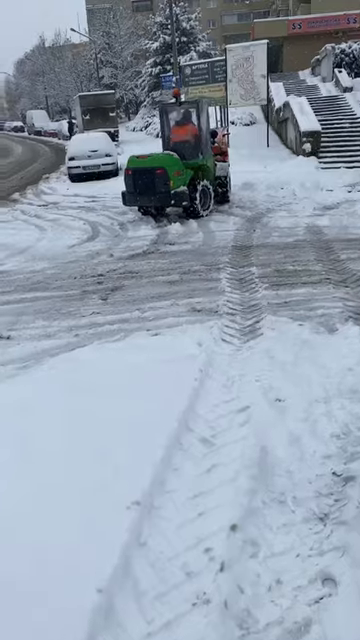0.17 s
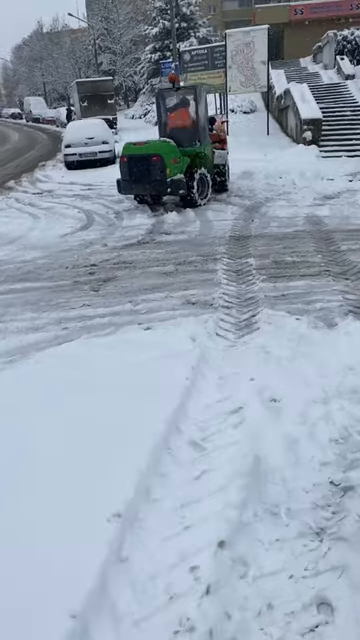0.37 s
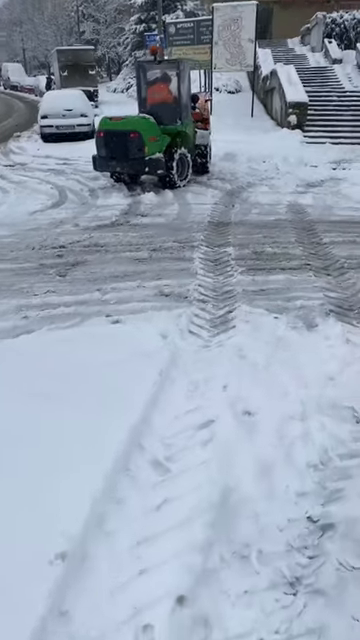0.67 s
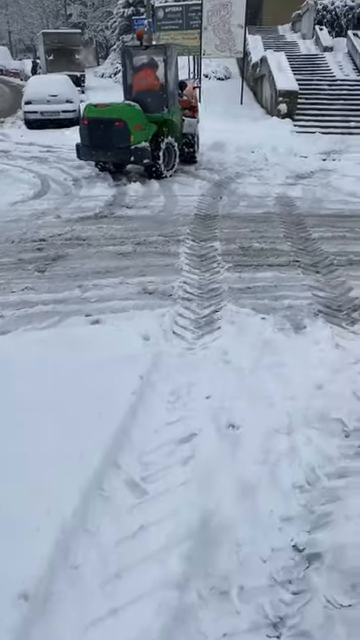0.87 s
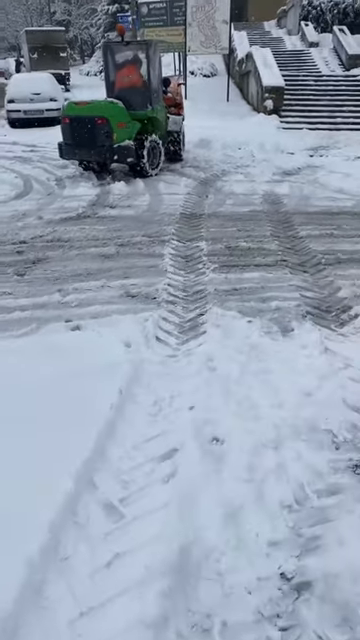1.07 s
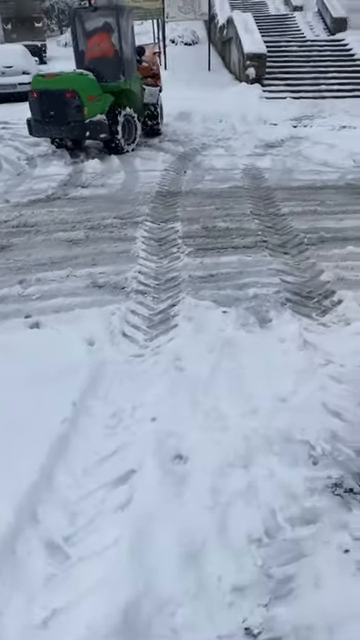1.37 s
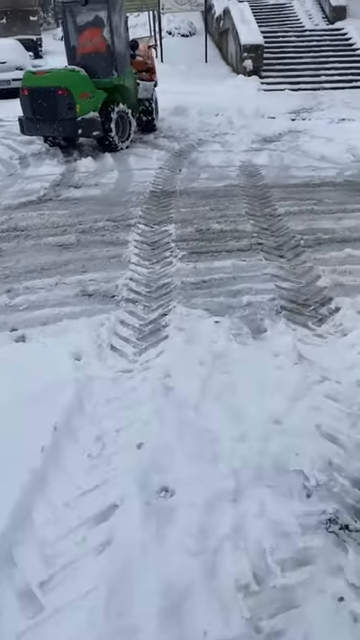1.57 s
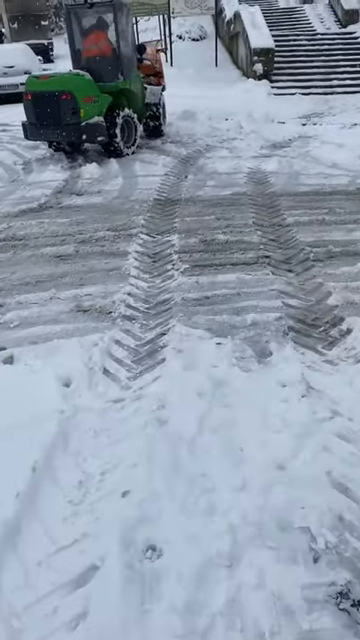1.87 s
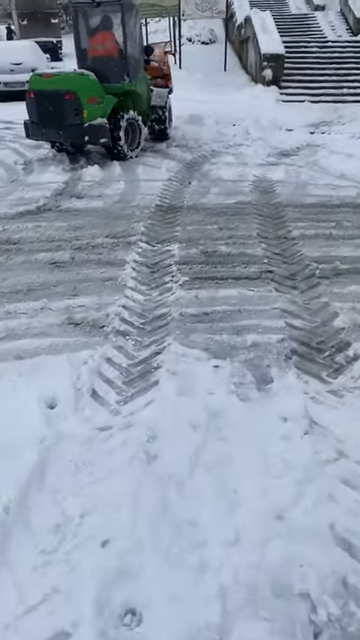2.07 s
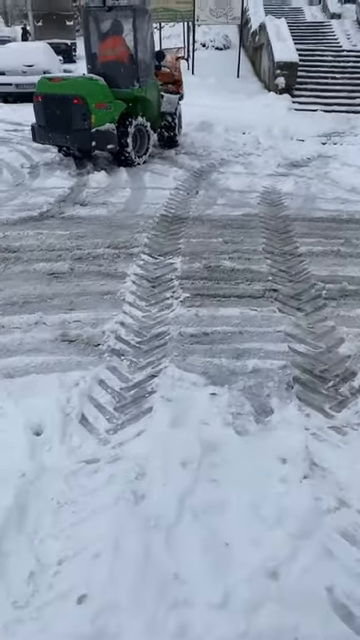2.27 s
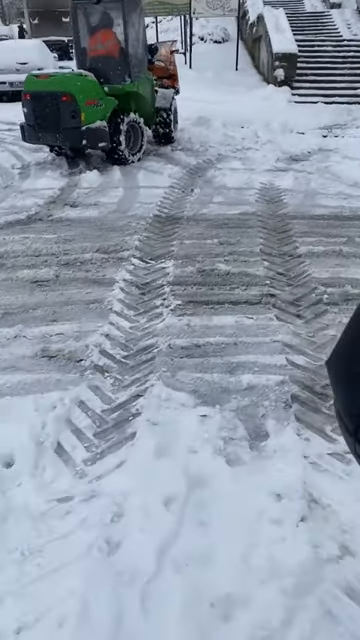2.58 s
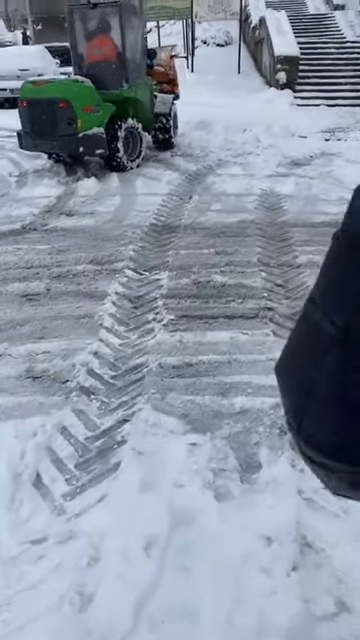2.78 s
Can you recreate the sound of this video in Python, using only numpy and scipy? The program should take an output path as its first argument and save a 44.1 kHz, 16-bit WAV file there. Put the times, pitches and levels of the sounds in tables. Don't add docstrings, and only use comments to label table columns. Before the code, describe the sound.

A small diesel tractor drones throughout at almost constant speed, some metres away on a snowy street: low buzzing hum, broad fan roar, dense metallic clatter and thin pump whine. Low wind buffeting rumbles on the hand-held phone until about 1.2 s, then fades. A short dull tap hits the case at 2.05 s, while hollow exhaust noise opens up; engine pitch sags very slightly near 2.4 s, then recovers.

```python
import sys
import numpy as np
from scipy import signal
from scipy.fft import rfft, irfft
from scipy.io import wavfile
from scipy.ndimage import uniform_filter1d, map_coordinates

SR = 44100
rng = np.random.default_rng(int(sys.argv[2]) if len(sys.argv) > 2 else 0)


def waveform_to_disk(signal):
    frames = np.transpose(np.atleast_2d(signal))
    scaled = np.clip(frames, -1, 1) * 32767
    samples = np.round(scaled).astype(np.int16)
    wavfile.write(sys.argv[1], SR, samples)


def ratio(d):
    e = np.asarray(d, float) / 20
    return 10 ** e


N = 128772

PUMP_RATIO = 3.448
# time_s, level_db, treble_db
POSE = [(.1, -1.5, -3.5), (.3, -1, 0.5), (.6, -1.5, 4.5), (.8, 0, -4), (1.05, 0.5, -4), (1.35, 1.5, -9.5),
        (1.6, 0, 2.5), (2.05, -0.5, 2), (2.35, 2, -2), (2.55, 0.5, -2), (2.7, 1, -3.5), (2.92, -0.5, 1)]
# time_s, level_db
TURN = [
    (.1, -25),
    (.7, -6),
    (1.2, -10),
    (1.7, -10),
    (2.0, 8),
    (2.4, 2.5),
    (2.7, 1),
    (2.92, 7),
]


def evened(x):
    return x / np.sqrt(np.mean(x ** 2) + 1e-20)


def curve(table, column, t=None):
    rows = np.array(table)
    if t is None:
        t = np.arange(N) / SR
    return np.interp(t, rows[:, 0], rows[:, column])


def drift(hz):
    f = np.fft.rfftfreq(N, 1 / SR)
    spectrum = rfft(rng.standard_normal(N)) / (1 + (f / hz) ** 4)
    return evened(irfft(spectrum, N))


def ring(x, hz, width_hz):
    r = np.exp(-np.pi * width_hz / SR)
    return signal.lfilter([1, 0, -1], [1, -2 * r * np.cos(2 * np.pi * hz / SR), r * r], x) * (1 - r)


def ticks(per_s, spread_db):
    strike = rng.random(N) < per_s / SR
    size = ratio(spread_db * np.minimum(rng.exponential(1, N), 4))
    return rng.choice([-1., 1.], N) * size * strike


def wind():
    # time_s, eddies_db, snaps_db
    gust = [(.1, -10.5, -58), (.18, -11, -20), (.29, -13.5, -18), (.39, -12.5, -15.5), (.53, -12, -36.5),
            (.63, -9, -26), (.72, -12.5, -31), (.82, -11, -23), (.9, -8.5, -21.5), (1.0, -16, -28),
            (1.06, -10, -21), (1.12, -13, -49), (1.3, -24, -65), (1.45, -36, -57), (1.7, -30, -35),
            (1.8, -21, -35), (2.0, -40, -35), (2.92, -37, -36)]
    # time_s, pitch_hz
    eddy_pitch = [(.1, 79.8), (.2, 100.6), (.35, 91), (.5, 64.47), (.64, 99.53), (.75, 90.6), (.9, 124.3),
                  (1.05, 80.24), (1.3, 60.14), (1.8, 70), (2.92, 80)]
    eddy_width_hz, evenness, lump_db = 71, 0.79, 1.0
    snap_hz, snap_width_hz = 230, 119

    slow = signal.lfilter(*signal.butter(2, eddy_width_hz / 2, fs=SR), rng.standard_normal((2, N)))
    swirl = (slow[0] + 1j * slow[1]) * np.exp(2j * np.pi * np.cumsum(curve(eddy_pitch, 1)) / SR)
    size = abs(swirl)
    eddies = evened((swirl / (size + 0.11 * size.mean()) ** evenness).real)
    eddies = signal.lfilter(*signal.butter(2, 52, "high", fs=SR), eddies)
    snaps = ring(ticks(per_s=200, spread_db=2.33), snap_hz, snap_width_hz)
    snaps = evened(ring(snaps, snap_hz, 2 * snap_width_hz))
    return ratio(curve(gust, 1) + lump_db * drift(8.4)) * eddies + ratio(curve(gust, 2)) * snaps


def knock():
    # start_s, peak_db, pitch_hz, decay_s
    tap = (2.0464, -8.5, 470, .00065)
    start_s, peak_db, hz, decay_s = tap
    t = np.maximum(np.arange(N) / SR - start_s, 0)
    swell = np.e * t / decay_s * np.exp(-t / decay_s)
    return -ratio(peak_db) * swell * np.sin(2 * np.pi * hz * t)


def roar():
    # pitch_hz, level_db
    colour = [(40, -1.5), (150, 2), (300, -7), (600, -4), (1100, -7), (2500, -8), (5500, -18), (15000, -32)]
    roar_db, patch_db, flicker_db, treble_hz = -24, 1, 0.96, 4740

    frames, hz = N // 256 + 5, np.fft.rfftfreq(1024, 1 / SR)
    real, imaginary, patches = rng.standard_normal((frames, 513, 3)).T
    patches = uniform_filter1d(patches, size=10, axis=0)
    patches = evened(uniform_filter1d(patches, size=14, axis=1))
    flicker = evened(uniform_filter1d(rng.standard_normal(frames), size=3))
    f, db = np.transpose(colour)
    shape = np.interp(np.log(hz + 1), np.log(f), db)[:, None]
    treble = (hz ** 2 / (hz ** 2 + treble_hz ** 2))[:, None]
    facing = curve(POSE, 2, np.arange(frames) * 256 / SR) * treble
    level_db = shape + facing + patch_db * patches + flicker_db * flicker
    noise = signal.istft((real + 1j * imaginary) * ratio(level_db), nperseg=1024, noverlap=768)[1]
    return ratio(roar_db) * evened(noise[:N])


def clatter(turns):
    # pitch_hz, width_hz, level_db
    panels = [(786, 170, -12), (1000, 180, 6.5), (1127, 110, 1), (1200, 290, -18), (1446, 76, -8),
              (1750, 240, 5), (2484, 330, 6.5), (2663, 310, 6.5), (3780, 400, -5.5), (4130, 350, -6),
              (6260, 330, -14), (7020, 150, -8)]
    clatter_db, firing_beat, pump_beat = -28.5, 0.8, 1.2

    after_firing = np.exp(-(turns % 1) / 0.39)
    after_stroke = np.exp(-(PUMP_RATIO * turns % 1) / 0.48)
    gate = 1 + firing_beat * after_firing + pump_beat * after_stroke
    drive = gate * ticks(per_s=5000, spread_db=2.0)
    rung = sum(ratio(db) * evened(ring(drive, hz, width_hz)) for hz, width_hz, db in panels)
    return ratio(clatter_db) * evened(rung)


def ground(x):
    # pitch_hz, width_hz, share_removed
    shadow = [
        (3000, 450, .55),
        (5250, 500, .3),
        (660, 150, .3),
    ]
    # time_s, delay_ms
    lag = [(.1, .905), (.3, .877), (.6, .848), (.8, .905), (1.05, .965), (1.2, .92), (1.35, .86),
           (1.8, .846), (2.05, .815), (2.35, .833), (2.55, .815), (2.72, .71), (2.92, .69)]
    echo, echo_hz = 0.58, 8000

    for hz, width_hz, share in shadow:
        x = x - share * ring(x, hz, width_hz)
    late = np.arange(N) - curve(lag, 1) * SR / 1000
    dull = signal.filtfilt(*signal.butter(1, echo_hz, fs=SR), x)
    bounce = map_coordinates(dull, [late], order=3)
    return ratio(curve(POSE, 1)) * (x + echo * bounce)


def exhaust_box():
    # pitch_hz, width_hz, level_db
    resonance = (770, 150, -38)
    hz, width_hz, db = resonance
    flow = ring(rng.standard_normal(N), hz, width_hz)
    return ratio(db + curve(TURN, 1)) * evened(ring(flow, hz, 2 * width_hz))


def orders(table, turns):
    waver_db, waver_hz, wander = 1.5, 5, 0.05
    total = np.zeros(N)
    for k, db in table:
        level = np.sqrt(2) * ratio(db + waver_db * drift(waver_hz))
        phase = 2 * np.pi * (k * turns + rng.random()) + wander * k * drift(waver_hz)
        total += level * np.sin(phase)
    return total


def pump_whine(turns):
    # multiple_of_piston_rate, level_db (rms)
    whine = [(4, -37), (5, -40), (5.51, -42), (6, -38), (6.775, -40.5), (7, -43), (7.165, -40.5),
             (9.1, -42), (9.29, -53)]
    return ratio(0.2 * curve(TURN, 1)) * orders(whine, PUMP_RATIO * turns)


def engine_hum(turns):
    # multiple_of_firing, level_db (rms)
    firing = [(1, -24), (2, -26.5), (3, -29), (4, -31), (5, -42), (8, -47.5)]
    # multiple_of_piston_rate, level_db (rms)
    pump = [(1, -23), (2, -42.5), (3, -45)]
    return orders(firing, turns) + orders(pump, PUMP_RATIO * turns)


def engine_turns():
    # time_s, firing_hz
    speed = [
        (0, 59.0),
        (1.95, 58.9),
        (2.4, 58.3),
        (2.92, 58.65),
    ]
    return np.cumsum(curve(speed, 1)) / SR


def scene():
    turns = engine_turns()
    at_microphone = wind() + knock()
    bodywork = ground(roar() + clatter(turns))
    tones = exhaust_box() + pump_whine(turns) + engine_hum(turns)
    return (at_microphone + bodywork + tones)[None]


def top_cut(x):
    return signal.sosfilt(signal.butter(12, 16000, fs=SR, output="sos"), x)


def record(dry):
    low_cut_hz, edge_hz, ceiling = 36, 15400, 1.3
    start_s, open_db, open_s = 0.073, -11, 0.07

    x = signal.sosfilt(signal.butter(2, low_cut_hz, "high", fs=SR, output="sos"), dry)
    band = signal.firwin(511, edge_hz, window=("kaiser", 9), fs=SR)
    x = signal.oaconvolve(x, band[None], "same")
    t = np.arange(N) / SR - start_s
    x = x * (t > 0) * ratio(open_db * np.clip(1 - t / open_s, 0, 1))
    return top_cut(ceiling * np.tanh(x / ceiling))


dry = scene()
out = record(dry)
waveform_to_disk(out)
```